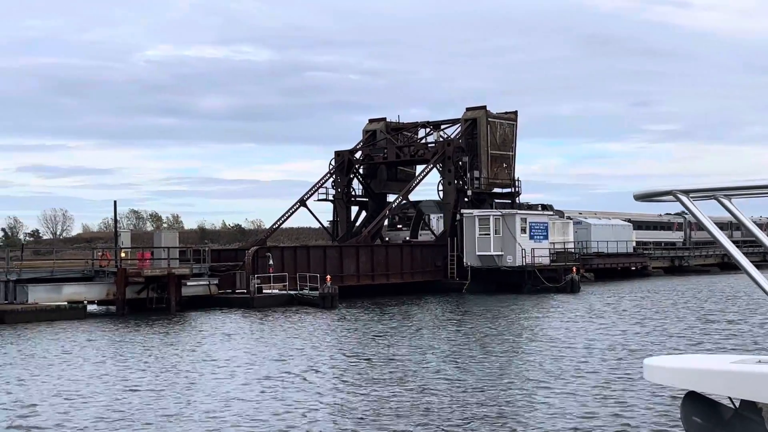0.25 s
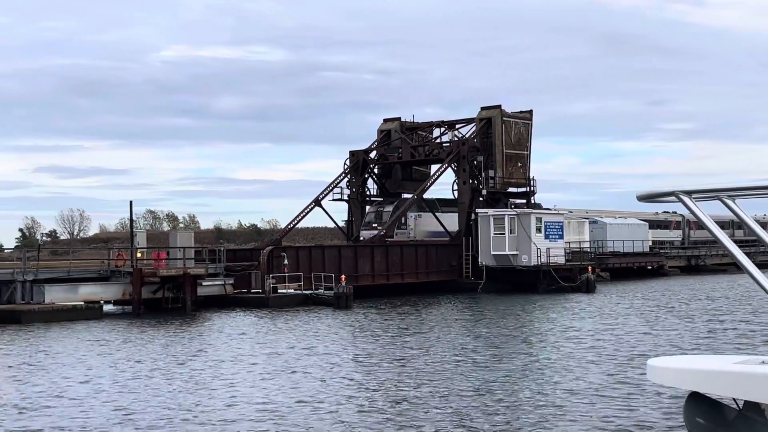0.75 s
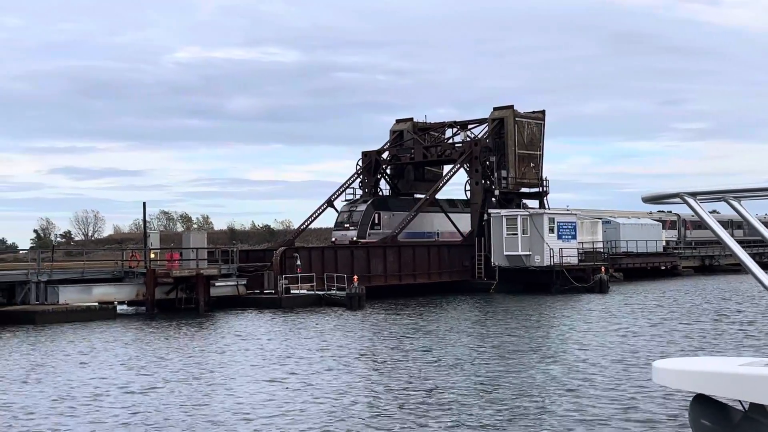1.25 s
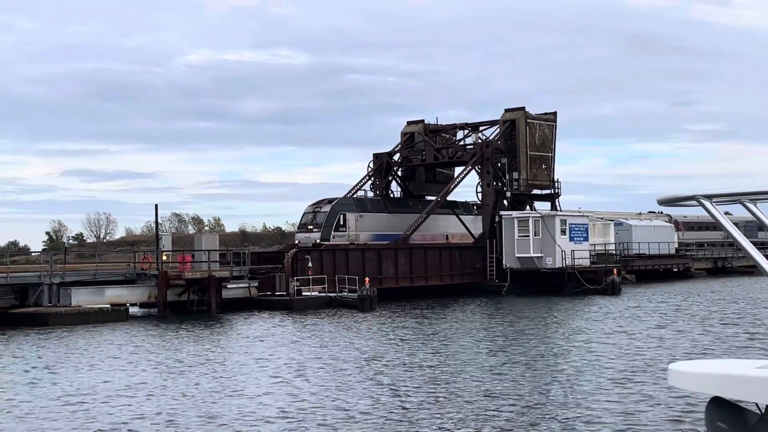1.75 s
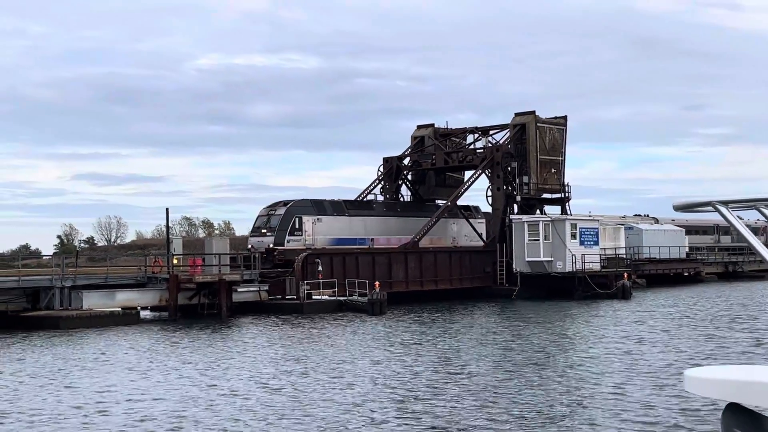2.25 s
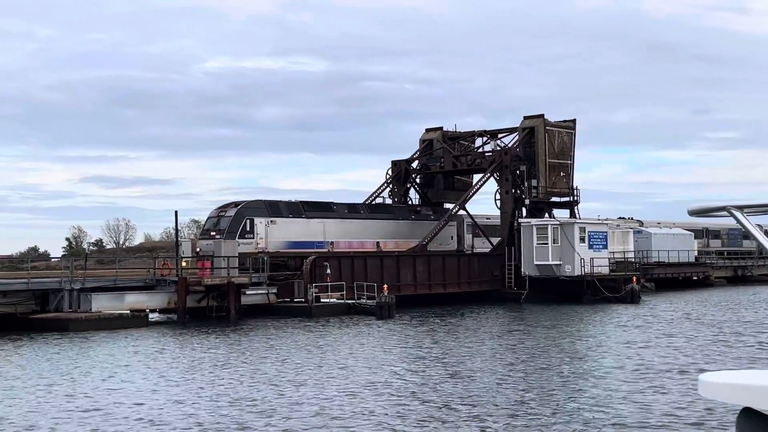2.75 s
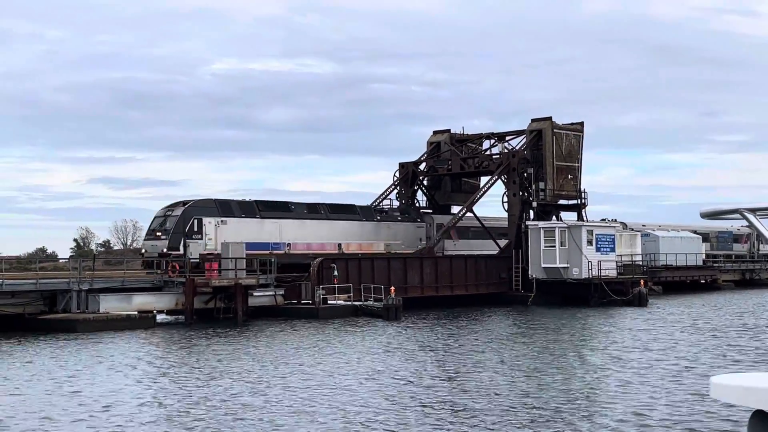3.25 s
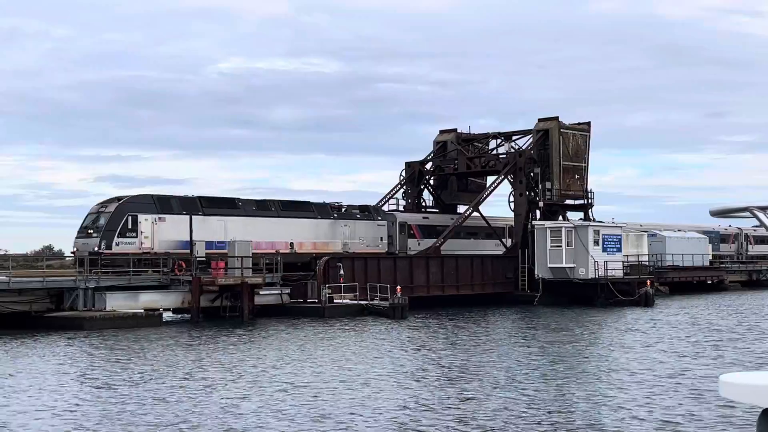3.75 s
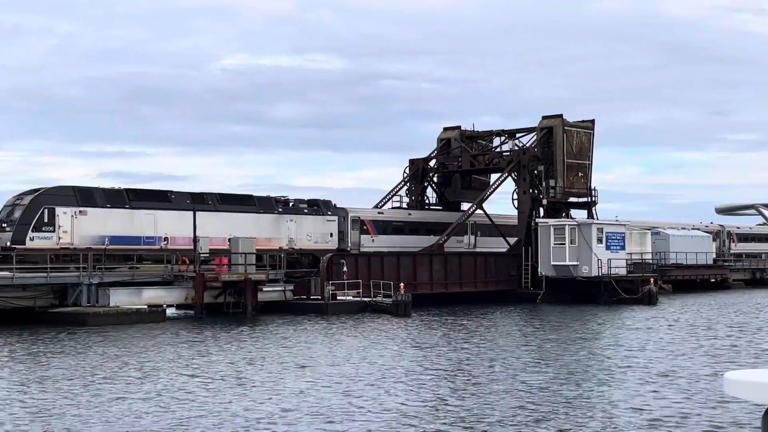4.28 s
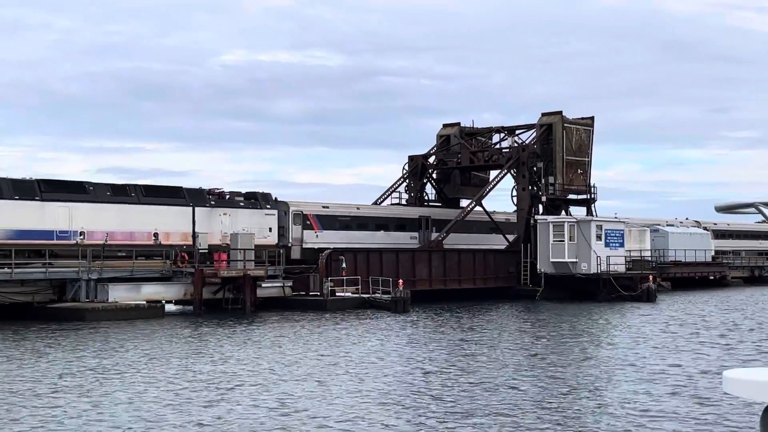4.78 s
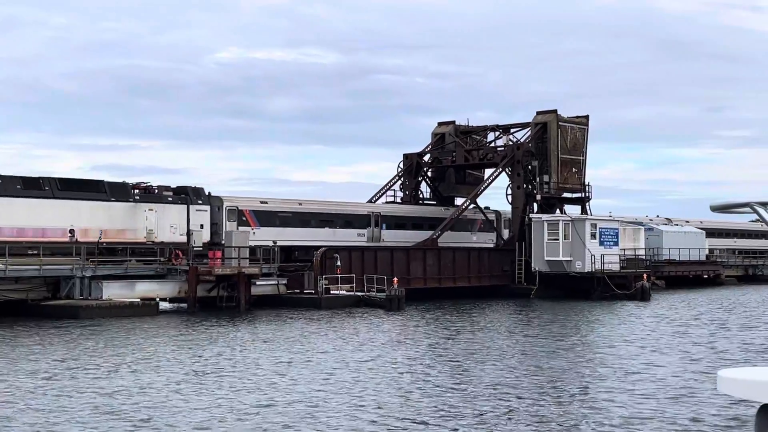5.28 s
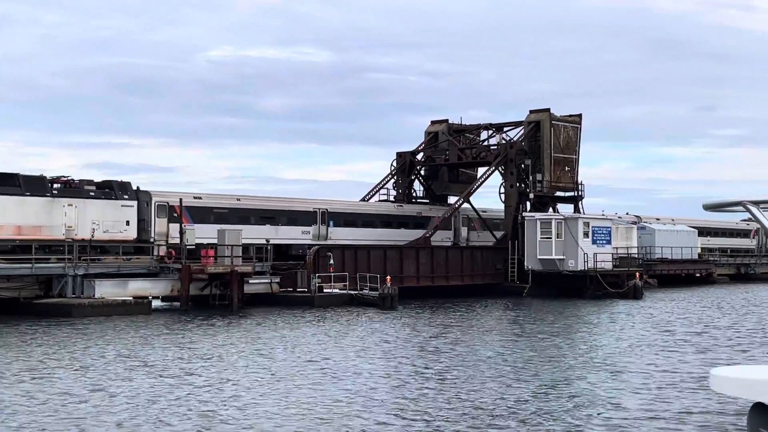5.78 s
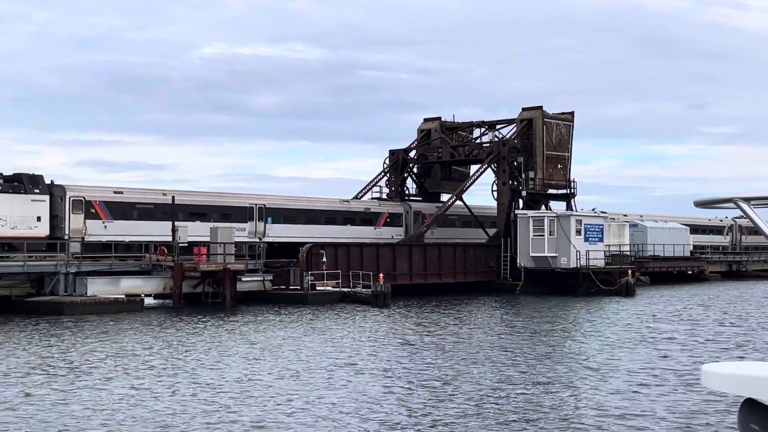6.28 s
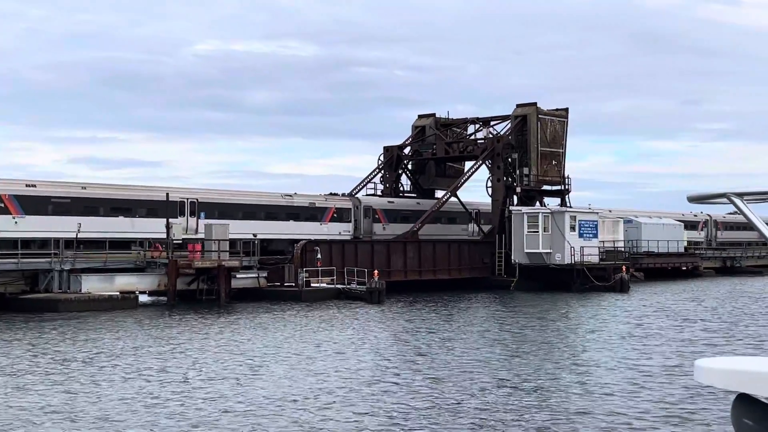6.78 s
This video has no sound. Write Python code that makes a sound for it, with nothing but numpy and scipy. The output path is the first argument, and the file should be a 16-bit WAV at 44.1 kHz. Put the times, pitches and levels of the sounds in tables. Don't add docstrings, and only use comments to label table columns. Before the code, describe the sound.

From 0 s, a train rumbles over a steel drawbridge in open air, with low girder drone, dull joint knocks and soft water wash. A small, bright bell tolls about every 0.7 s throughout, faint beneath the train. Metallic rattle and airy hiss surge near 1.1 and 1.4 s, with short wheel squeals. At 1.65 s a five-note air horn bursts in, dominating everything; its dense brassy chord sags in pitch by 2 s, becomes brightest and buzzing, then softens and rises slightly as it dies by 2.8 s. A thin echo returns from shore, and tiny high brake squeaks flicker around 2.6 s. Automatic gain has pushed the train down. From 2.9 s wheel passes come in uneven waves of hiss, clatter and thuds, with faint squeals. From 5 to 7 s the deep rumble grows heavier and the bell clearer, still rolling at the end.

```python
import sys
import numpy as np
from scipy import signal
from scipy.fft import rfft, irfft, next_fast_len
from scipy.io import wavfile
from scipy.ndimage import uniform_filter1d, map_coordinates

SR = 44100
rng = np.random.default_rng(int(sys.argv[2]) if len(sys.argv) > 2 else 0)


def generate_wav(signal):
    frames = np.transpose(np.atleast_2d(signal))
    scaled = np.clip(frames, -1, 1) * 32767
    pcm = np.round(scaled).astype(np.int16)
    wavfile.write(sys.argv[1], SR, pcm)


def natural_amplitude(level_db):
    exponent = np.asarray(level_db, float) / 20
    return 10 ** exponent


N = 310023

# pitch in Hz, share from 0 to 1.
SHARE_AHEAD = [(60, 1), (200, 0.8), (700, 0.87), (1200, 0.84), (2000, 0.98), (5000, 0.99), (9000, 0.97),
               (12000, 0.71), (14000, 0.9)]
# pitch in Hz, level in dB per Hz.
WASH_COLOUR = [(2000, -16.5), (3500, -1.5), (5000, 1.5), (7500, -10), (10000, -22.5), (14300, -48)]
# pitch in Hz, time to fall 60 dB in seconds.
BANKS_FADE = [(200, 0.81), (1000, 1.28), (4000, 1.1), (12000, 0.15)]
# pitch in Hz, level in dB.
SHORE_COLOUR = [(500, -38), (750, -23.5), (1250, -25.5), (1490, 6), (1750, -17), (2200, -11.5), (2700, -22),
                (3600, -49)]

# pitch in Hz, level in dB per Hz.
RUMBLE_COLOUR = [(12, -63.5), (25, -36), (38, -19), (48, -6.5), (76, -1), (93, 0), (124, -8), (200, -13),
                 (260, -32), (440, -120)]
GIRDER_COLOUR = [(70, -23.5), (120, -13), (250, -5.5), (400, -8.5), (600, -14.5), (900, -20.5),
                 (1200, -29.5), (1500, -29.5), (2200, -73.5)]
CLATTER_COLOUR = [(700, -13.5), (1200, -1.5), (1600, 0.5), (1740, 5), (1880, -0.5), (2150, -4),
                  (2600, -7.5), (3100, -7.5), (4200, -22), (5500, -37), (9000, -120)]
HISS_COLOUR = [(2000, -32.5), (3500, -2.5), (5000, -0.5), (6400, -4.5), (7500, -3.5), (8500, -7),
               (10300, -11.5), (12500, -20.5), (14300, -18.5)]
# time in seconds, level in dB,
# weight on the span in dB.
TRAIN_LEVEL = [(0, 0, 2), (.6, -0.5, 5), (.95, 1, -5.5), (1.3, 6, -2), (1.62, 5.5, 5.5), (1.76, -0.5, 2.5),
               (1.86, -12, 3), (2.3, -20, 4), (2.6, -8.5, -2), (2.95, -9.5, -3.5), (3.2, -14, 4),
               (4.05, -15, 0.5), (4.5, -14, 8.5), (5.0, -12.5, 5.5), (5.35, -13, 8.5), (6.0, -9.5, 13.5),
               (6.55, -8, 11.5), (7.03, -5, 12.5)]
# loudest moment in seconds, rattle rise in dB, hiss rise in dB,
# length in seconds.
BOGIE_PASSES = [(0.584, 3, 0, 0.06), (1.098, 9.5, 14.5, 0.096), (1.424, 7, 12, 0.093), (2.902, 2, 6, 0.095),
                (3.156, 3.5, 9, 0.021), (3.25, 2, 9, .05), (3.35, 1, 2, .06), (3.496, 5, 10.5, 0.087),
                (3.849, 6.5, 12.5, 0.103), (4.185, 5, 6.5, 0.12), (4.644, 0.5, 11.5, .06),
                (4.793, 5, 7.5, 0.07), (4.941, 3.5, 7.5, .04), (5.065, 4.5, 10, .09), (5.525, 3, 12, 0.15),
                (5.808, 4, 14.5, 0.14), (6.366, 1, 8.5, 0.12), (6.66, 2.5, 10.5, 0.093),
                (6.815, 4.5, 8, 0.065)]
# start in seconds, rumble rise in dB.
AXLE_THUDS = [(.028, 2.5), (.154, 0), (.59, 1.5), (1.055, 9), (1.17, 3.5), (1.48, 1), (3.04, 3), (3.177, 6),
              (3.519, 1), (3.731, 3.5), (4.284, 6), (4.385, 3.5), (4.46, 1.5), (4.62, 2.5), (5.266, 3.5),
              (5.391, 6.5), (5.93, -0.5), (6.127, 4.5), (6.541, 8), (6.73, 3.5)]

# start in seconds, peak in dB, #
# centre pitch in Hz, time to fall 60 dB in seconds.
KNOCKS_AND_PUFF = [(0.024, -28.5, 537, 0.048), (.17, -26.5, 580, 0.05), (0.352, -53, 8000, 0.018),
                   (.276, -57, 10500, .02), (2.3, -33, 440, .06), (1.218, -21, 318, 0.39),
                   (3.2315, -44, 900, 0.03), (4.905, -48, 790, .25), (3.0625, -36, 310, 0.077),
                   (3.1708, -39, 360, .07), (4.23, -39.5, 300, .3), (.298, -28.5, 280, .1),
                   (.56, -28.5, 250, .22), (6.27, -31, 300, .22), (6.41, -28, 230, 0.16),
                   (1.44, -26, 560, 0.13), (1.085, -28, 600, .15), (4.1, -49, 720, 0.041),
                   (3.388, -38.5, 554, 0.061), (4.149, -58.5, 3600, 0.17), (4.595, -30.5, 287, 0.25),
                   (4.762, -52, 3100, 0.1), (3.84, -58, 3200, 0.14), (2.599, -51, 10080, 0.62),
                   (.298, -56, 7060, .015), (5.4018, -27, 201, 0.1), (5.2, -36.5, 220, 0.2),
                   (5.6, -34.5, 270, 0.15), (5.93, -30, 300, 0.14), (6.15, -30, 253, 0.22),
                   (4.75, -37, 300, 0.21), (5.775, -45.5, 2000, 0.19), (6.785, -48, 2700, 0.13)]
# pitch in Hz, level in dB, start in seconds.
BRAKE_SQUEAKS = [(9800, -72, 2.6), (11600, -67, 2.6), (13000, -66, 2.68), (13000, -71, 2.8),
                 (12500, -68, 2.6), (13900, -70, 2.64), (5400, -62, 2.62), (5300, -70, 4.62)]
# start in seconds, level in dB, length in seconds.
WHEEL_SQUEALS = [(1.02, -47.5, 0.14), (1.228, -56.5, 0.13), (1.33, -49.5, 0.11), (2.823, -70, .1),
                 (3.42, -71.5, 0.15), (3.7, -73, 0.14), (4.63, -75, 0.09), (4.917, -68, 0.11),
                 (5.412, -68.5, 0.25), (5.71, -64, 0.11), (6.3, -70.5, 0.21), (6.588, -65.5, 0.13)]
# pitch in Hz, width in Hz, level in dB.
WHEEL_MODES = [(6400, 250, -1.5), (5200, 110, -9)]

# start in seconds, peak in dB, upper tones in dB, bloom of the main tone in dB.
BELL_STROKES = [(.15, -52.5, -17, -0.5), (.83, -53.5, -5, 0), (1.51, -51, -14, -0.5),
                (2.8779, -56, -6.5, -3), (3.5735, -55, -8, -1.5), (4.255, -56.5, -3, -4),
                (4.929, -59, -2, 3), (5.6055, -50, -15.5, 11.5), (6.2997, -50.5, -6, 3.5),
                (6.9697, -47, -14, -6)]
# pitch in Hz, level in dB, time to fall 60 dB in seconds.
BELL_MODES = [(1500, -1, .25), (1545, 1, 1.3), (1728, 4, 2.05), (2070, -9.5, 0.6), (2820, 0, 1),
              (2865, 2, 1.9), (4150, -8, 1.6), (5500, -11.5, 1)]

# pitch in Hz, level in dB.
AIR_COLOUR = [(200, -120), (300, 9), (700, -5), (1200, 3.5), (2000, 3.5), (3200, -4), (3850, -10),
              (4300, -9.5), (5000, -10.5), (7000, -17.5), (10000, -25), (14400, -33.5)]
# time in seconds, pitch sag from 0 to 1, brightness in dB per octave, level in dB.
HORN_VALVE = [
    (1.66, 0, -3.5, 0),
    (1.76, .12, -3.5, 1),
    (1.85, 0.64, 0.1, -0.5),
    (1.96, .92, 1.27, -2.5),
    (2.07, 0.95, 2.5, -2.5),
    (2.3, 0.96, -0.7, -3),
    (2.45, 0.74, -4.5, -4.5),
    (2.6, .3, -5.5, -9.5),
    (2.78, 0.05, -5.5, -13.5),
]
# start in seconds, end in seconds, rest pitch in Hz, sag in Hz, level in dB.
CHIMES = [
    (1.685, 2.7, 326.2, 10.7, -37),
    (1.672, 2.76, 378, 8.7, -26.5),
    (1.66, 2.7, 437, 10.6, -18.5),
    (1.7, 2.7, 506, 12, -20),
    (1.634, 2.81, 642.1, 15.2, -13),
]
# opening kick in dB, fade in dB per second, own brightness in dB
# per octave, share of the common brightness, release in seconds, time of the kick's peak in seconds.
VOICES = [(-3, 1.5, 1, 0.83, 0.037, .01), (-2.5, 5, 0.43, 0.93, 0.17, .03), (3.5, 3, 0.45, 1.4, 0.14, .06),
          (7.5, 3, -1.5, 0.97, 0.23, 0.013), (5, 7.5, 1, 1.01, 0.033, 0.014)]
# multiple of the pitch, level in dB.
LOW_TONES = [(1, -3.5), (2, 15), (3, -2.5), (4, -4), (5, -9), (6, -0.5), (7, -10), (8, -12.5), (10, -13.5),
             (11, -16.5), (14, -34)]
SECOND_TONES = [(1, -1), (2, 4), (3, -3), (4, -12.5), (5, 0.5), (6, -16.5), (7, -13.5), (8, -13),
                (9, -25.5), (10, -31), (11, -26), (12, -30.5), (13, -37)]
THIRD_TONES = [(1, 10.5), (2, -4.5), (3, 3), (4, 2.5), (5, -29), (6, -15), (7, -30), (8, -30), (9, -38),
               (10, -33), (11, -25), (12, -37.5)]
FOURTH_TONES = [(1, 7), (2, -3), (3, -9), (4, -5), (5, -12), (6, -12.5), (7, -26.5), (8, -36), (9, -38),
                (10, -23.5)]
HIGH_TONES = [(1, 8.5), (2, -1), (3, -4.5), (4, -14), (5, -20), (6, -32), (7, -32), (8, -46)]
# rise in dB, by multiple.
TOP_FLARE_DB = [0, 4, 2, 2.5, 0, 17, 13]
# time in seconds, top pitch in Hz,
# how far the octave lies above it in Hz.
BEAT = [(1.66, 644, 9.3), (1.74, 642, 9.3), (1.865, 635, 6.7), (2.025, 627.5, 5.8), (2.195, 626.3, 5.96),
        (2.33, 626.5, 5.1), (2.43, 629.5, 0), (2.47, 635.5, -8), (2.56, 638, -10.7), (2.65, 640, -11.5),
        (2.78, 642.5, -11.5)]
HALF_TONE = (2.1, 2.7, 484, 11, -34)
SIDE_TONES = [(1.6, 2.3, 1190, 24, -42), (1.6, 2.5, 1200, 20, -44), (1.73, 2.63, 423, 12, -27.5),
              (1.68, 2.6, 364, 9, -35.5)]
SIDE_VOICE = (0, 4, 0, 0, .08, 0)
UNDER_TONE = (1.75, 2.5, 619, 17, -25)
UNDER_VOICE = (0, 28, 0, 0, .08, 0)

# pitch in Hz, steering between left and right in degrees.
PORT_STEER = [(100, 43), (340, 40), (690, 32), (860, 19), (1130, 0), (1370, -38), (1500, -64), (1650, -90),
              (1720, -110), (1900, -121), (2500, -134), (3500, -135)]
# pitch in Hz, lag of the left port in turns.
PORT_LAG = [(300, 0), (520, -.06), (620, -.13), (690, -.13), (880, -.14), (1100, 0), (1300, -.08),
            (1900, -.08), (2200, 0), (5300, 0), (5700, .15), (6500, .17), (7600, .37), (8000, .5),
            (8800, .5), (9500, .64), (10400, .82), (11000, 1), (13300, 1), (14400, 1.5)]

SPEAK_S = 0.017
NULL_S, NULL_TURNS = 2.43, 0.64


def unit(x):
    return x / np.sqrt(np.mean(x ** 2) + 1e-20)


def along(points, hz):
    f, v = np.transpose(points)
    return np.interp(np.log(hz + 1), np.log(f + 1), v)


def curves(rows):
    s, *cols = np.transpose(rows)
    return [np.interp(np.arange(N) / SR, s, c) for c in cols]


def wobble(rate, size=None):
    size = size or N
    knots = rng.standard_normal(int(size * rate / SR) + 4)
    return map_coordinates(knots, [np.arange(size) * rate / SR])


def filtered(x, response):
    m = next_fast_len(N + 8192)
    return irfft(rfft(x, m) * response(np.fft.rfftfreq(m, 1 / SR)), m)[..., :N]


def rush(spectrum, patchy_db, grain_db):
    grainy = rng.standard_normal((2, N)) * natural_amplitude(grain_db * wobble(400))
    z = signal.stft(grainy, nperseg=512)[2]
    field = uniform_filter1d(rng.standard_normal(z.shape[1:]), size=5, axis=0)
    field = uniform_filter1d(field, size=8, axis=1)
    pair = signal.istft(z * natural_amplitude(patchy_db * unit(field)), nperseg=512)[1][:, :N]

    def colour(hz):
        turn = np.arccos(np.clip(along(SHARE_AHEAD, hz), -1, 1)) / 2
        return natural_amplitude(along(spectrum, hz)) * [np.cos(turn), np.sin(turn)]

    mid, side = filtered(pair, colour)
    return unit(np.array([mid + side, mid - side]))


def water():
    return natural_amplitude(-74.5) * rush(WASH_COLOUR, patchy_db=3.0, grain_db=1.5)


def banks(x):
    hz, t, z = signal.stft(rng.standard_normal((2, SR)), SR, nperseg=256)
    fade_db = -60 * t / along(BANKS_FADE, hz)[:, None]
    tail = signal.istft(z * natural_amplitude(fade_db), SR, nperseg=256)[1]
    tail[1] = 0.79 * tail[0] + 1.4 * tail[1]
    delayed = np.pad(x, (1500, 0))[None]
    return signal.fftconvolve(delayed, tail / np.linalg.norm(tail[0]), axes=1)[:, :N]


def shore(x):
    delay_s, sharp = 0.38, 1.007
    t = np.arange(N) / SR
    heard = np.interp(NULL_S + (t - NULL_S - delay_s) * sharp, t, x)
    return natural_amplitude(-10) * filtered(heard, lambda hz: natural_amplitude(along(SHORE_COLOUR, hz)))


def rolling():
    rise_share = 0.59
    thud_s = 0.025
    t = np.arange(N) / SR
    level_db, weight_db = curves(TRAIN_LEVEL)
    swells = []
    for s, _, _, length in BOGIE_PASSES:
        width = length * np.where(t < s, rise_share, 1)
        swells.append(np.exp(-((t - s) / width) ** 2))
    rattle_db, hiss_db = np.transpose(BOGIE_PASSES)[1:3] @ swells
    thud_db = np.zeros(N)
    for s, db in AXLE_THUDS:
        u = np.maximum(t - s, 0) / thud_s
        thud_db += db * u * np.exp(1 - u)

    rumble_db = -33.5 + level_db + weight_db + thud_db
    girder_db = -34.5 + level_db + 0.2 * weight_db + 0.52 * rattle_db
    girder_db += 0.8 + 0.8 * wobble(14)
    clatter_db = -55.5 + level_db + rattle_db + 9.5
    fizz_db = -66.5 + 1.15 * level_db + hiss_db + 5.5
    out = natural_amplitude(rumble_db) * rush(RUMBLE_COLOUR, patchy_db=0.17, grain_db=1.14)
    out += natural_amplitude(girder_db) * rush(GIRDER_COLOUR, patchy_db=1.2, grain_db=1.5)
    out += natural_amplitude(clatter_db) * rush(CLATTER_COLOUR, patchy_db=1.0, grain_db=1.0)
    return out + natural_amplitude(fizz_db) * rush(HISS_COLOUR, patchy_db=2.0, grain_db=1)


def knocks():
    out, t = np.zeros(N + SR), np.arange(SR // 3) / SR
    for s, db, centre_hz, t60 in KNOCKS_AND_PUFF:
        spread = 1.3 + 0.7 * (centre_hz > 3000) - 0.13 * (t60 > 0.21 and centre_hz < 1000)
        band = signal.butter(2, [centre_hz / spread, centre_hz * spread], "bandpass", fs=SR)
        burst = unit(signal.lfilter(*band, rng.standard_normal(len(t))))
        rings = (t60 < 0.08 or t60 > 0.35) * (centre_hz < 1000)
        burst = burst + rings * np.sin(2 * np.pi * centre_hz * t)
        rise_s = max(0.002, 0.12 * t60 ** 2)
        shape = natural_amplitude(db + 0.5 - 60 * t / t60) * (1 - np.exp(-t / rise_s))
        out[round(s * SR):][:len(t)] += shape * burst
    return out[:N]


def brake():
    out, t = np.zeros(N), np.arange(SR // 2) / SR
    swell = np.clip(t / 0.024, 0, 1) * np.exp(-(t / 0.09) ** 2)
    for hz, db, s in BRAKE_SQUEAKS:
        loudness = natural_amplitude(db + 3 * wobble(25, size=len(t))) * swell
        whistle = np.sin(2 * np.pi * hz * t + wobble(40, size=len(t)))
        out[round(s * SR):][:len(t)] += loudness * whistle
    return out


def squeal():
    t = np.arange(N) / SR
    shape = np.zeros(N)
    for s, db, length in WHEEL_SQUEALS:
        fade = np.exp(-(np.maximum(t - s, 0) / length) ** 2)
        shape += natural_amplitude(db) * np.clip((t - s) / 0.015, 0, 1) * fade

    def modes(f):
        return sum(natural_amplitude(db) / (1 + (2 * (f - hz) / width) ** 2) for hz, width, db in WHEEL_MODES)

    return shape * unit(filtered(rng.standard_normal(N), modes))


def bell():
    out, t = np.zeros(N + SR), np.arange(SR) / SR
    bloom = np.exp(-((t - 0.051) / 0.036) ** 2) - 0.97 * np.exp(-t / 0.015)
    for s, stroke_db, upper_db, bloom_db in BELL_STROKES:
        for hz, mode_db, t60 in BELL_MODES:
            db = stroke_db - 2.0 + mode_db + upper_db * (hz > 2400)
            db = db + bloom_db * bloom * (1600 < hz < 1900)
            db = db - 60 * t / t60 + 3 * wobble(45, size=SR)
            blur = 1.15 * np.sqrt(min(hz, 9800 - hz) / 1700)
            ring = np.sin(2 * np.pi * hz * t + blur * wobble(55, size=SR))
            out[round(s * SR):][:SR] += natural_amplitude(db) * (1 - np.exp(-t / 0.0045)) * ring
    return out[:N]


def air():
    close_s = 0.089
    t, (start, stop) = np.arange(N) / SR, CHIMES[-1][:2]
    valve = np.clip(np.minimum((t - start) / SPEAK_S, (stop - t) / close_s), 0, 1)
    level_db = -45.5 + 3.2 * curves(HORN_VALVE)[1] + 14
    return valve * natural_amplitude(level_db) * rush(AIR_COLOUR, patchy_db=0.8, grain_db=2)


def chime(row, voice, tones, speak_s=SPEAK_S, turns=0, pitch_hz=None, scoop=0.3, flare_db=(0,), drag=0):
    scoop_share, scoop_s = 0.14, 0.0105
    kick_wide_s, die_db = 0.028, 31
    flare_s, flare_in_s = 0.145, 0.028
    start, stop, rest_hz, sag_hz, chime_db = row
    kick_db, fade_db, own_db, share, die_s, kick_s = voice
    sag, bright_db, blast_db = curves(HORN_VALVE)
    if pitch_hz is None:
        pitch_hz = rest_hz - sag_hz * sag
    slide = 1 - scoop * scoop_share * np.exp(-((np.arange(N) / SR - start) / scoop_s) ** 2)
    phase = 2 * np.pi * np.cumsum(pitch_hz * slide) / SR

    on = slice(round(start * SR), round(stop * SR))
    size = on.stop - on.start
    t = np.arange(size) / SR
    left_s = t[-1] - t
    dying = np.clip(1 - left_s / die_s, 0, 1)
    level_db = chime_db + blast_db[on] + kick_db * np.exp(-((t - kick_s) / kick_wide_s) ** 2)
    level_db = level_db - fade_db * t - die_db * dying ** 2
    tilt_db = own_db + share * bright_db[on]
    flare = np.exp(-(t / flare_s) ** 3) * np.clip(t / flare_in_s, 0, 1)

    order, strength_db = np.transpose(list(tones) + [(2 * tones[-1][0], tones[-1][1] - 15)])
    jitter = 0.06 * wobble(60, size=size)
    phase = (phase + drag)[on] - phase[round(NULL_S * SR)] + 2 * np.pi * turns + jitter
    out = np.zeros(N)
    for k in range(1, int(order[-1])):
        db = level_db + np.interp(k, order, strength_db) - strength_db[0] + tilt_db * np.log2(k)
        db += flare_db[min(k, len(flare_db)) - 1] * flare
        shade_db = min(k, 3) * 0.5 * wobble(14, size=size)
        out[on] += np.sqrt(2) * natural_amplitude(db + shade_db) * np.sin(k * phase + 0.3 * k * k)
    out[on] *= np.clip(np.minimum(t / speak_s, left_s / SPEAK_S), 0, 1) ** 2.5
    return out


def horn():
    middle_tones = (SECOND_TONES, THIRD_TONES, FOURTH_TONES)
    middle = sum(chime(*parts) for parts in zip(CHIMES[1:], VOICES[1:], middle_tones))

    top_hz, gap_hz = curves(BEAT)
    beat = np.cumsum(gap_hz) / SR
    beat = 2 * np.pi * (beat - beat[round(NULL_S * SR)] - NULL_TURNS)
    drag = 0.75 * (1 + np.cos(beat + 0.9)) * np.tanh(gap_hz / 3)
    yields = curves(HORN_VALVE)[0] / 2
    low_hz = (top_hz + gap_hz) / 2
    out = middle + chime(CHIMES[0], VOICES[0], LOW_TONES, pitch_hz=low_hz, drag=drag * (1 - yields) / 2)
    out += chime(CHIMES[-1], VOICES[-1], HIGH_TONES, turns=NULL_TURNS, pitch_hz=top_hz, scoop=1,
                 flare_db=TOP_FLARE_DB, drag=-drag * yields)

    side_speak_s = 0.12
    for row in (HALF_TONE, *SIDE_TONES):
        out += chime(row, SIDE_VOICE, [(1, 0)], side_speak_s)
    out += chime(UNDER_TONE, UNDER_VOICE, [(1, 0)], side_speak_s)
    bent = filtered(out ** 2, lambda hz: 1 / (1 + (260 / (hz + 1)) ** 8))
    return out + 0.18 * bent + shore(middle)


def scene():
    ahead = horn() + bell() + squeal() + knocks() + brake()
    echo = natural_amplitude(-23) * banks(ahead)
    return ahead + echo + air() + rolling() + water()


def roll_off(x):
    return signal.sosfilt(signal.butter(12, 14370, fs=SR, output="sos"), x)


def record(dry):
    def steer(hz):
        return np.radians(along(PORT_STEER, hz))

    def lag(hz):
        return np.exp(-1j * np.pi * along(PORT_LAG, hz) * [[1], [-1]])

    ahead = filtered(dry[0] + dry[1], lambda hz: lag(hz) * [np.cos(steer(hz)), np.sin(steer(hz))])
    aside = filtered(dry[0] - dry[1], lambda hz: lag(hz) * [np.sin(steer(hz)), -np.cos(steer(hz))])
    ports = (ahead + aside) / np.sqrt(2)
    mix = ports / (1 + np.abs(ports) ** 6) ** (1 / 6)
    return roll_off(mix)


dry = scene()
out = record(dry)
generate_wav(out)
```